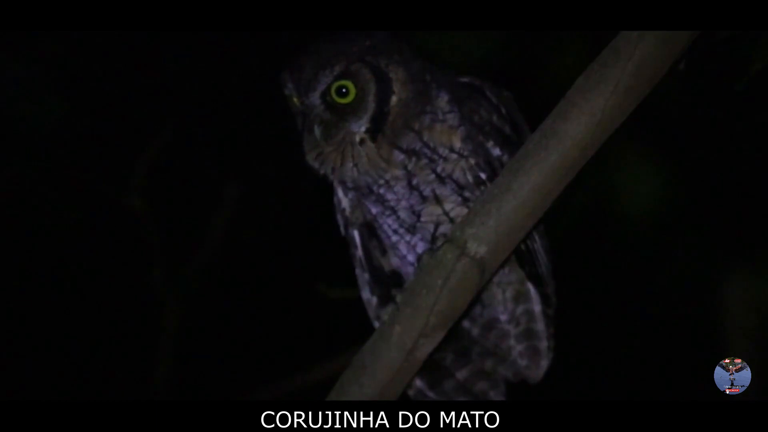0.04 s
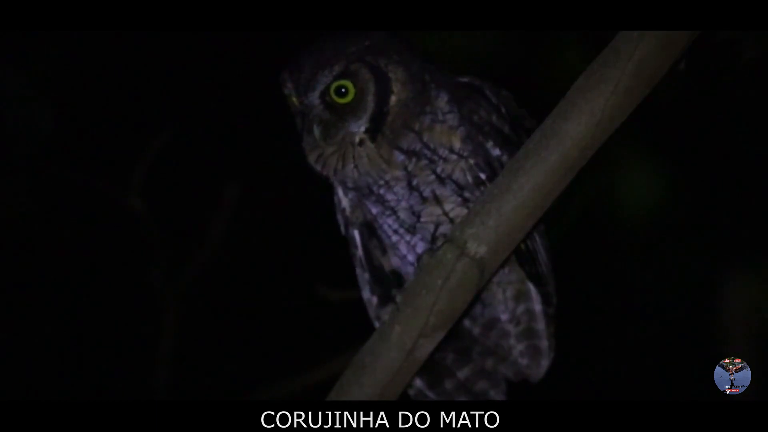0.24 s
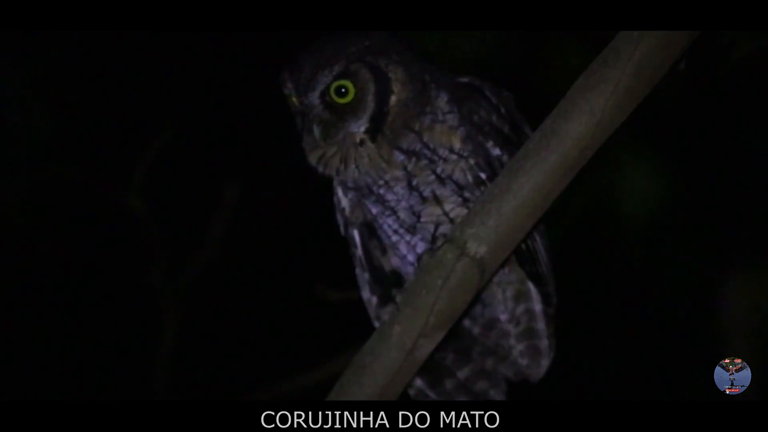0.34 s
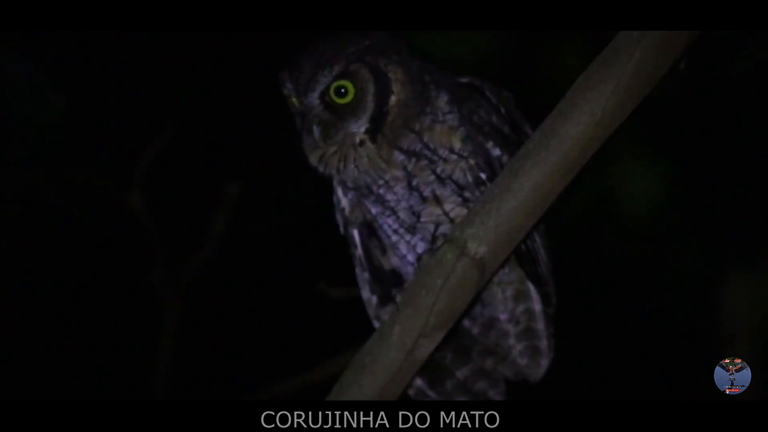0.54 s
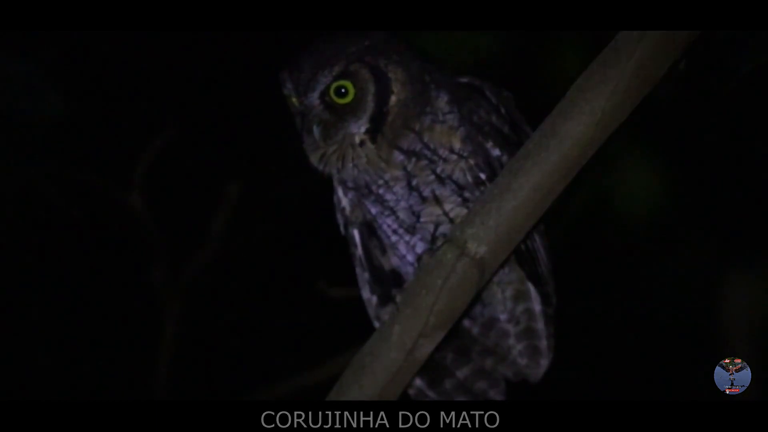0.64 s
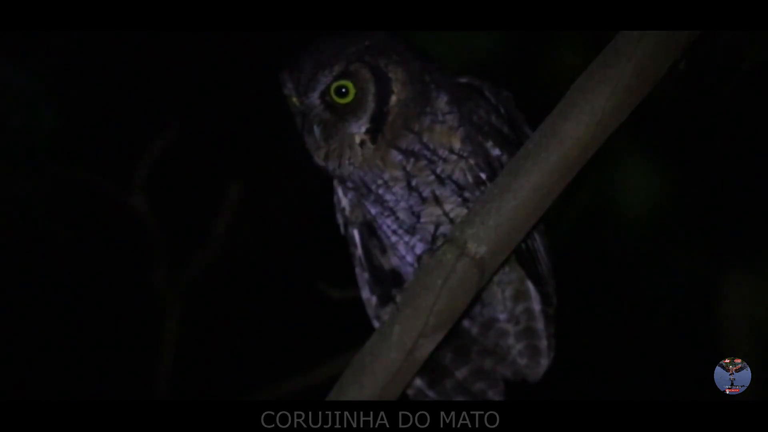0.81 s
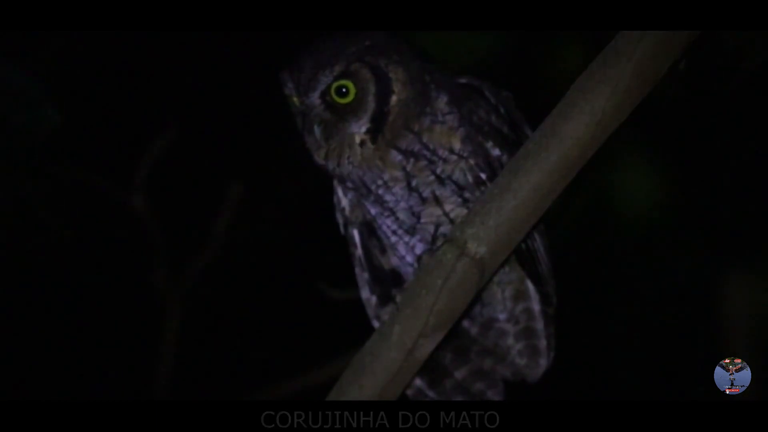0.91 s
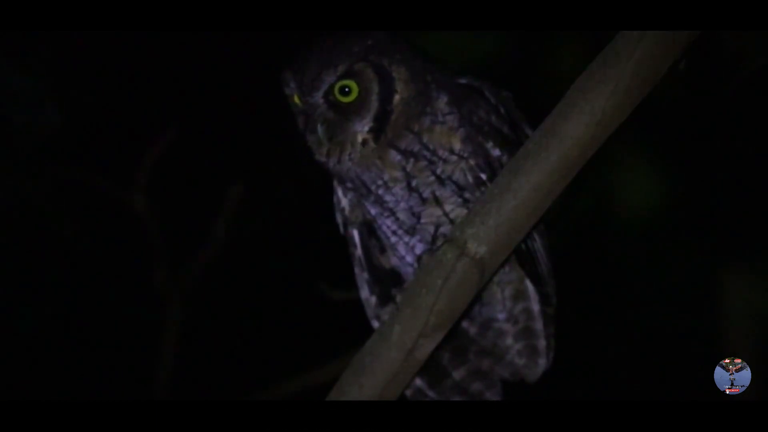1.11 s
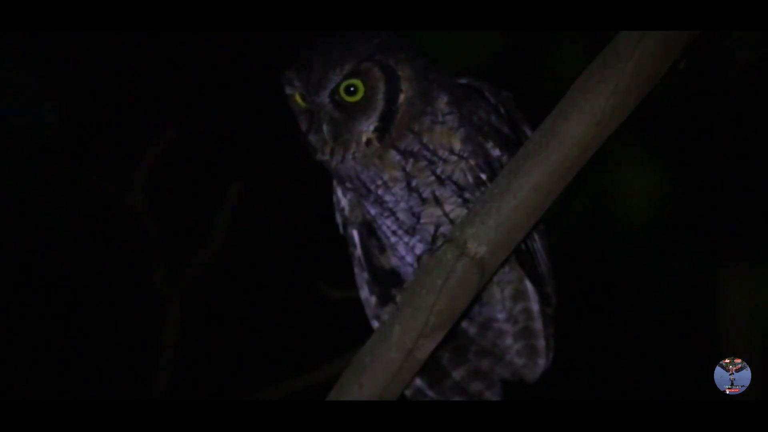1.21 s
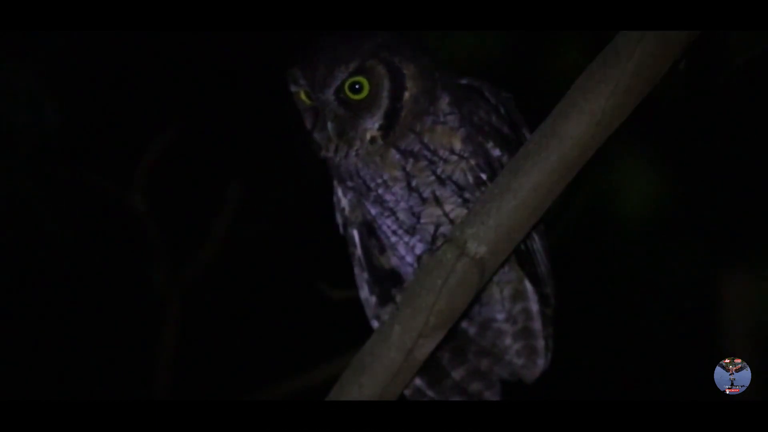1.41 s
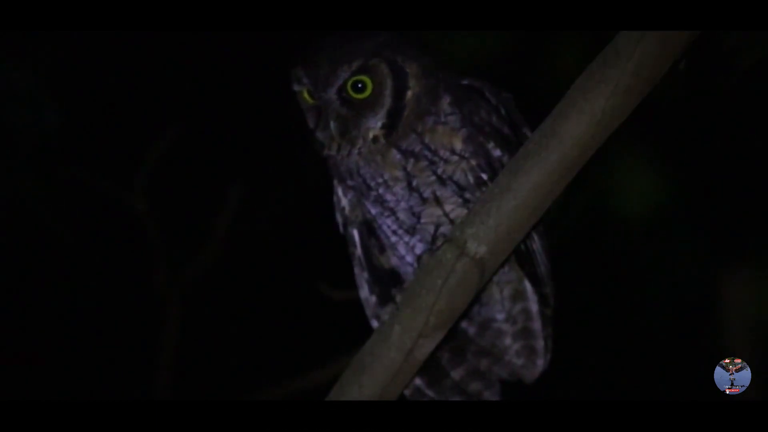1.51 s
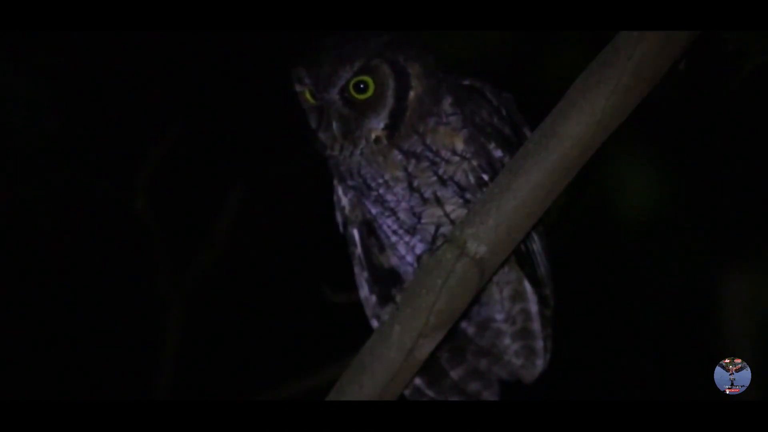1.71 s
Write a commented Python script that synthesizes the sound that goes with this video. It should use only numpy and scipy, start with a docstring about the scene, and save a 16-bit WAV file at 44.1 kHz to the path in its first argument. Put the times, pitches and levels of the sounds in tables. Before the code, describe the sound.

A small owl trills quick hoots that grow higher and louder, the last two drawn out, with a brief forest echo. Then only a faint rasping katydid, crickets and distant frogs remain in the night.

```python
"""In a forest at night, a small owl on a branch ends its trill: short hoots that each rise and fall in
pitch, growing higher and louder, the last two drawn out. Trunks and leaves throw them back briefly.
Close by on the right, a katydid (a bush cricket) rasps by scraping its wings. Further off, two crickets
chirp with their wings, frogs rattle and pip, and a few soft whistles sound over a low rumble."""
import sys
import numpy as np
from scipy import signal
from scipy.fft import rfft, irfft
from scipy.io import wavfile

SR = 44100
rng = np.random.default_rng(int(sys.argv[2]) if len(sys.argv) > 2 else 0)


def wav_out(sig):
    """Save sig, one row per channel (or a flat mono array), as 16-bit PCM at SR to the path in sys.argv[1]."""
    wavfile.write(sys.argv[1], SR, np.round(np.clip(np.atleast_2d(sig).T, -1, 1) * 32767).astype(np.int16))


N = 77175
T = np.arange(N) / SR

DROOP_SHARE, ARCH_POWER = 0.3, 2.65   # a hoot starts and ends 30% below its top pitch
SPILL_DB, SPILL_GROWTH = -28.5, 0.1   # overtones scatter widely, and grow less than the hoots do
# The owl's hoots: start t/s, length t/s, top pitch f/Hz, level/dB,
# then level/dB of the overtones at 2, 3 and 7 times the pitch, relative to the main tone
OWL_HOOTS = [(-.034, 0.049, 712, -26, 0.5, -54.5, -78), (0.05, 0.04, 693.6, -26, -4, -44.5, -72),
             (0.12, 0.053, 687.4, -25.5, -5, -57, -62), (.198, .046, 699, -23, -6.5, -50.5, -69),
             (0.271, 0.049, 720.6, -21, -6.5, -39, -65), (.353, .056, 741.6, -18, -5, -39, -65),
             (0.454, 0.077, 774.6, -10.5, -9.5, -28.5, -63.5),
             (0.594, 0.098, 795.7, -7, -12.5, -31.5, -37.5)]
def owl():
    """Nearly pure hoots whose pitch arches up and down; the highest overtones show only at the top."""
    jitter = 1 + 0.002 * drift(150)   # tiny wobble in pitch
    shimmer = from_db(0.75 * drift(60))   # wobble in loudness
    flutter = from_db(-1.3 * drift(70))   # wobble in the overtones' loudness
    voice, spill = np.zeros((2, N))
    for start, length, top_hz, db, second_db, third_db, seventh_db in OWL_HOOTS:
        progress = np.clip((T - start) / length, 0, 1)
        hz = top_hz * (1 - DROOP_SHARE * np.abs(2 * progress - 1) ** ARCH_POWER)
        phase = 2 * np.pi * np.cumsum(hz * jitter) / SR
        effort = swell(progress, rise=.33, fall=.31)
        overtones = (from_db(second_db) * np.cos(2 * phase)
                     + from_db(third_db) * swell(progress) * np.cos(3 * phase)
                     + from_db(seventh_db) * swell(progress) ** 5 * np.cos(7 * phase))
        hoot = effort * (np.cos(phase) + flutter * overtones)
        voice += from_db(db) * (hoot + husk(start, top_hz))
        spill += from_db(SPILL_GROWTH * db) * effort * overtones
    fade_in = np.sin(np.pi / 2 * np.minimum(T / .004, 1)) ** 2
    scattered = scatter(spill * fade_in, decay_s=FOREST_DECAY_S, build_s=0.021)
    return forest(voice * shimmer * fade_in) + from_db(SPILL_DB) * scattered


HUSK_DB, HUSK_LEAD_S, HUSK_S = -26.5, 0.028, 0.045
# Where the owl's throat rings: multiple of the top pitch, width f/Hz, relative level/dB
THROAT_BANDS = [(.9, 80, 5), (1.88, 120, -5)]
def husk(start, top_hz):
    """A husky catch opens each hoot: the throat vibrates roughly just before the tone locks in."""
    noise = rng.standard_normal(N)
    throat = np.zeros(N)
    for multiple, width, db in THROAT_BANDS:
        hz = multiple * top_hz
        band = signal.butter(2, [hz - width, hz + width], "band", fs=SR, output="sos")
        throat += from_db(db) * rms_one(signal.sosfilt(band, resonate(noise, hz, 2 * width)))
    return from_db(HUSK_DB) * swell((T - start + HUSK_LEAD_S) / HUSK_S, rise=.61, fall=.27) * throat


LEAVES_DB, LEAVES_SIDE_DB, FOREST_DECAY_S = -21.5, -8, 0.13
# Echoes from nearby trunks: delay t/s, relative level/dB
TRUNK_ECHOES = [(.00751, -10.5), (.01441, -10.5), (.03112, -14.5), (.04496, -21.5)]
def forest(x):
    """The sound arrives directly, then bounces off a few trunks and briefly off the leaves."""
    echoes = sum(from_db(db) * np.interp(T - delay, T, x, left=0) for delay, db in TRUNK_ECHOES)
    mid, side = (scatter(x, FOREST_DECAY_S, build_s=0.036) for _ in range(2))
    return x + echoes + from_db(LEAVES_DB) * (mid + from_db(LEAVES_SIDE_DB) * side * [[1], [-1]])


KATYDID_DB, KATYDID_LEAVES_DB, CHORUS_DB = -55, -59.5, -60
SNAP_S, SNAP_SPEED = 0.0024, 0.87   # the tooth strikes slow down at the very end of a stroke
# The katydid's wing cycles, each a long stroke and then a short one: end of the long stroke t/s
CYCLE_TIMES = [.006, .103, .201, .297, 0.395, .492, 0.586, 0.685, .781, .878, .975, 1.071, 1.17, 1.264,
               1.366, 1.467, 1.565, 1.661, 1.755]
# The two strokes: end t/s from the cycle time, length t/s, relative level/dB, teeth per s, swell power
WING_STROKES = [(-.001, .041, 2.5, 830, .8), (0.048, 0.034, -1.5, 900, 1.1)]
def katydid():
    """A scraper runs ever harder over a row of teeth and snaps off the end; each tooth rings the wing."""
    clicks = np.zeros(N)
    for lag, length, db, teeth_per_s, power in WING_STROKES:
        force = np.zeros(N)
        speed = teeth_per_s * (1 + .14 * drift(48))
        for cycle in CYCLE_TIMES:
            time_left = cycle + lag - T
            scraping = (time_left > 0) & (time_left < length)
            force[scraping] = np.minimum(1.7 * (1 - time_left[scraping] / length), 1) ** power
            speed[scraping & (time_left < SNAP_S)] *= SNAP_SPEED
        teeth_passed = np.floor(np.cumsum(speed) / SR)
        clicks += from_db(db) * force * np.diff(teeth_passed, prepend=0)
    clicks *= from_db(-0.5 * rng.standard_normal(N))   # no two clicks are equally loud
    rasp = wing(clicks + from_db(-11.5) * scatter(clicks, decay_s=0.036, build_s=.0005))
    direct = from_db(KATYDID_DB) * pan(rasp, right_db=13)
    leaves = np.array([scatter(rasp, decay_s=0.1668, build_s=0.006) for _ in range(2)])
    chorus = wing(rng.standard_normal(N))   # distant katydids blend into a hiss
    return direct + from_db(KATYDID_LEAVES_DB) * leaves + from_db(CHORUS_DB) * chorus


# Where the katydid's wing rings: f/Hz, width f/Hz, relative level/dB
WING_BANDS = [(8900, 1100, -29.5), (10930, 260, -6), (10945, 610, -5.5), (12160, 500, 4), (12400, 1800, -4),
              (13200, 300, -1), (14900, 350, -6.5)]
def wing(x):
    """The wing rings at several very high pitches; the result has an average strength of 1."""
    ringing = sum(from_db(db) * resonate(x, hz, width) for hz, width, db in WING_BANDS)
    return rms_one(signal.sosfilt(signal.butter(6, 8500, "high", fs=SR, output="sos"), ringing))


# The lower cricket's chirps: start t/s, length t/s, level/dB
LOW_CRICKET = [(.868, 0.086, -65.5), (1.017, 0.092, -61), (1.19, 0.12, -61), (1.348, 0.082, -60),
               (1.512, .105, -61), (1.678, .11, -61)]
# The higher cricket's chirps: start t/s, length t/s, level/dB
HIGH_CRICKET = [(-.14, .185, -60), (.425, .185, -59.5), (1.003, .205, -59), (1.607, .2, -59)]
def cricket(chirps, hz, pulse_s, sag_hz, edge_share):
    """Each wing stroke is a tiny beep that sags in pitch; a run of them makes a chirp."""
    out = np.zeros(N)
    for start, length, db in chirps:
        chirp = swell((T - start) / length, rise=edge_share, fall=edge_share)
        stroke = (T - start) / pulse_s % 1
        beeps = swell(stroke, rise=.55) * tone(hz - sag_hz * (stroke - .5), waver_hz=24.2)
        out += from_db(db) * chirp * beeps
    return out


RATTLE_HZ, RATTLE_WIDTH_HZ, RATTLE_PULSE_S = 3475, 200, 0.044
# The pulses of a frog's rattle: middle t/s
RATTLE_TIMES = [.595, 0.638, .685, .73, 0.776, 0.822, .868, 0.912, 0.959, 1.008, 1.056, 1.102, 1.147, 1.195,
                1.244, 1.289, 1.344, 1.39, 1.442, 1.498, 1.555]
# How the rattle grows: t/s, level/dB
RATTLE_GROWTH = [(.6, -70.5), (.8, -64.5), (1.1, -59.5), (1.56, -60.5)]
def rattling_frog():
    """Pulses of noise ring in a frog's throat: a coarse rattle that grows and stops."""
    pulses = sum(swell((T - middle) / RATTLE_PULSE_S + .5) for middle in RATTLE_TIMES)
    noise = resonate(rng.standard_normal(N), RATTLE_HZ, 2 * RATTLE_WIDTH_HZ)
    throat = rms_one(resonate(noise, RATTLE_HZ, RATTLE_WIDTH_HZ))
    return from_db(np.interp(T, *np.transpose(RATTLE_GROWTH))) * pulses * throat


PIP_HZ, PIP_DB, PIP_S = 2812, -58, 0.018
# A small frog's pips: start t/s
PIP_TIMES = [0.073, 0.134, .3, .409, 0.466, 0.521, 0.642, .777, 0.887, .943, 1.0, 1.101, 1.225, 1.283, 1.35,
             1.436, 1.503, 1.632]
def small_frog():
    """Short pips on one note, each starting quickly and fading away."""
    pips = sum(swell((T - start) / PIP_S, rise=.2, fall=1) for start in PIP_TIMES)
    return from_db(PIP_DB) * pips * tone(PIP_HZ, waver_hz=30.22)


# Far whistled calls: start t/s, length t/s, pitch f/Hz, level/dB
WHISTLES = [(1.219, 0.084, 1423, -55.5), (1.275, 0.082, 2390, -65), (1.699, 0.081, 2290, -66.5)]
def whistles():
    """Soft single whistles from deep in the forest."""
    return sum(from_db(db) * swell((T - start) / length) * tone(hz, waver_hz=33)
               for start, length, hz, db in WHISTLES)


AIR_DB = -58.5
# Night air and far insects, from low to high: f/Hz, relative level/dB
AIR_SPECTRUM = [(20, -2), (45, -2), (75, 2.5), (115, -2), (170, -12), (260, -16.5), (430, -13.5),
                (800, -23.5), (1400, -29), (2100, -33), (3000, -16), (3600, -21), (4300, -27),
                (6500, -23.5), (7500, -44.5), (15000, -35)]
# How alike the air sounds in both ears: f/Hz, likeness (1 = the same)
EAR_LIKENESS = [(60, 1), (300, 0.9), (1400, 1), (3100, .5), (7000, .4)]
def night_air():
    """A low rumble and a faint hiss; the high sounds spread wider between the ears."""
    hz = np.fft.rfftfreq(N, 1 / SR)
    mid, side = rfft(rng.standard_normal((2, N))) * from_db(at_hz(AIR_SPECTRUM, hz))
    alike = at_hz(EAR_LIKENESS, hz)
    both_ears = np.sqrt(1 + alike) * mid + np.sqrt(1 - alike) * side * [[1], [-1]]
    return from_db(AIR_DB) * rms_one(irfft(both_ears, N))


def far_off(x, right_db, leaves_db):
    """A distant caller, blurred by the leaves."""
    leaves = np.array([scatter(x, decay_s=.2, build_s=0.0013) for _ in range(2)])
    return pan(x, right_db) + from_db(leaves_db) * leaves


def scatter(x, decay_s, build_s):
    """Countless tiny echoes from leaves build up, then die away by 60 dB every decay_s."""
    t = T[:N // 3]
    tail = rng.standard_normal(len(t)) * from_db(-60 * t / decay_s) * (1 - np.exp(-t / build_s)) ** 2
    return signal.fftconvolve(x, tail / np.sqrt(np.sum(tail ** 2)))[:N]


def pan(x, right_db):
    """Place a sound to the right (+) or left (-)."""
    return x * from_db(np.array([[-right_db], [right_db]]) / 2)


def tone(hz, waver_hz):
    """A pure tone whose pitch wavers quickly, by about waver_hz."""
    return np.sin(2 * np.pi * np.cumsum(hz + waver_hz * drift(110)) / SR)


def swell(progress, rise=.5, fall=.5):
    """Fade in and out as progress runs from 0 to 1; rise and fall are shares of that span."""
    up = np.sin(np.pi / 2 * np.clip(progress / rise, 0, 1))
    down = np.sin(np.pi / 2 * np.clip((1 - progress) / fall, 0, 1))
    return (up * down) ** 2


def resonate(x, hz, width_hz):
    """Ring at one pitch: sound near it passes, the rest is weakened."""
    r = np.exp(-np.pi * width_hz / SR)
    feedback = [1, -2 * r * np.cos(2 * np.pi * hz / SR), r * r]
    return signal.lfilter(np.array([1, 0, -1]) * (1 - r * r) / 2, feedback, x + 1e-18)


def drift(rate_hz):
    """A smooth random wobble, about 1 in size."""
    r = np.exp(-2 * np.pi * rate_hz / SR)
    return rms_one(signal.lfilter([1], [1, -2 * r, r * r], rng.standard_normal(2 * N))[N:])


def at_hz(points, hz):
    """Read between a table's rows, giving each octave equal room."""
    row_hz, values = np.transpose(points)
    return np.interp(np.log(hz + 1), np.log(row_hz), values)


def rms_one(x):
    """Scale to an average strength (rms) of 1."""
    return x / np.sqrt(np.mean(x ** 2) + 1e-20)


def from_db(db):
    """Turn decibels into a multiplier."""
    return 10 ** (np.asarray(db) / 20)


def scene():
    """The owl in the middle, the small callers around it."""
    low = cricket(LOW_CRICKET, hz=5138, pulse_s=0.0173, sag_hz=120, edge_share=0.1)
    high = cricket(HIGH_CRICKET, hz=6100, pulse_s=.0168, sag_hz=264.1, edge_share=0.14)
    crickets = far_off(low, right_db=-10.5, leaves_db=1) + far_off(high, right_db=6.5, leaves_db=-8)
    nearby = owl() + katydid()
    far_callers = far_off(rattling_frog() + small_frog() + whistles(), right_db=6, leaves_db=-3.5)
    return nearby + crickets + far_callers + night_air()


def record(dry):
    """Sound above 15780 Hz is cut away steeply."""
    return signal.sosfilt(signal.ellip(12, .1, 80, 15780, fs=SR, output="sos"), dry)


dry = scene()
out = record(dry)
wav_out(out)
```